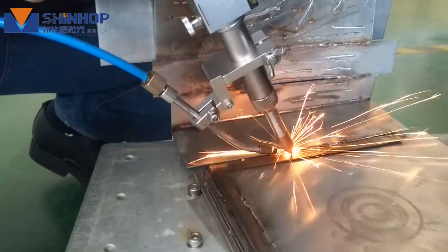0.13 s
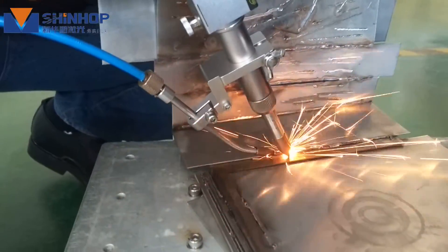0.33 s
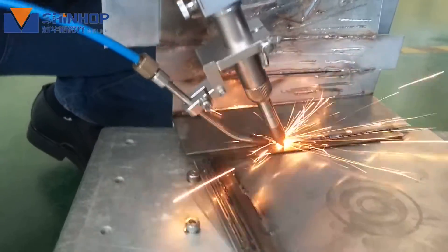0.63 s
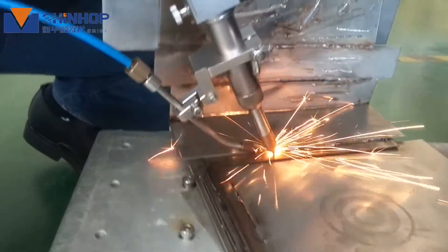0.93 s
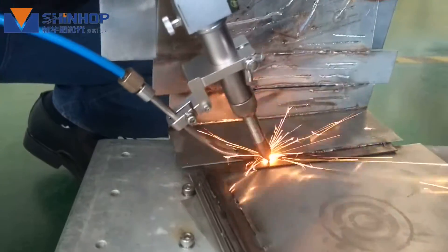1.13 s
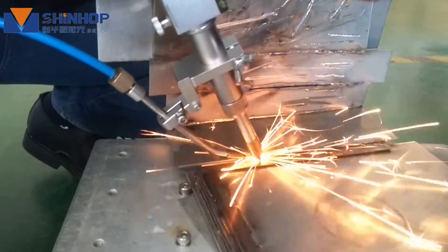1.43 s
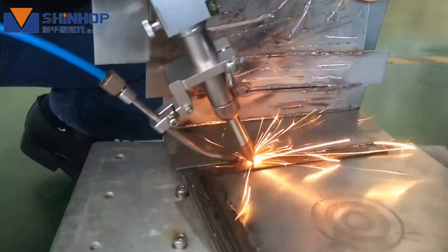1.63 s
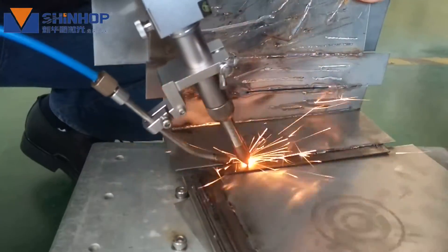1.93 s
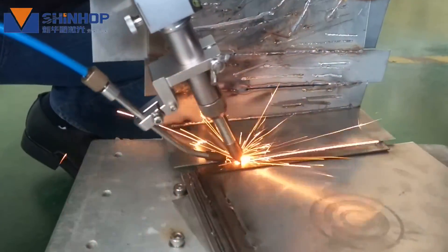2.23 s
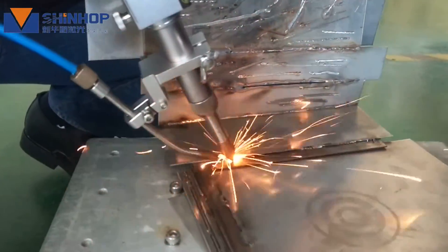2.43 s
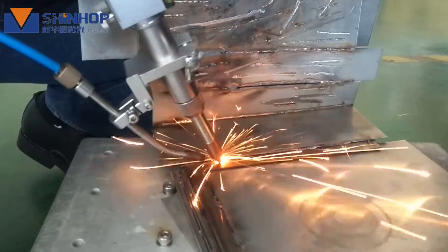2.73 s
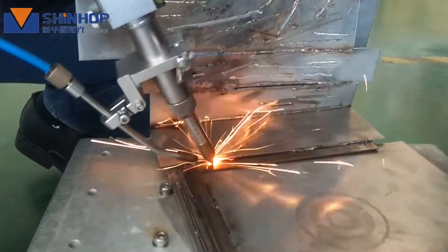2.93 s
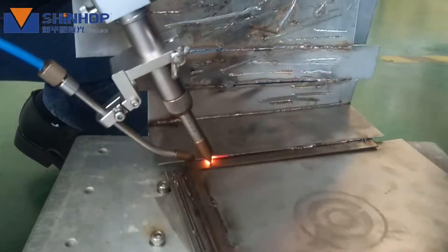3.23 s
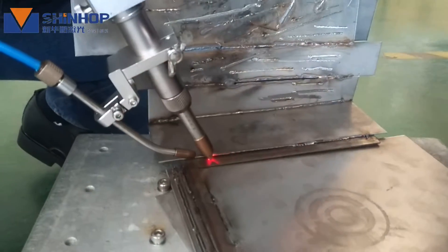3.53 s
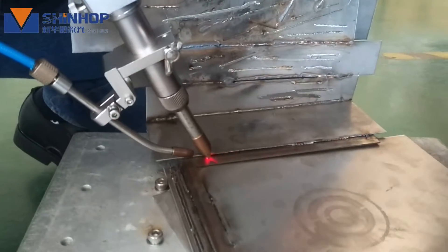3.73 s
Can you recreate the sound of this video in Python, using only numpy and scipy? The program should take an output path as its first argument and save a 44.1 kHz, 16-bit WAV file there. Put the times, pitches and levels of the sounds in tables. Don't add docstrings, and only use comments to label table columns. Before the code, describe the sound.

A handheld laser welder close to the microphone hisses and sizzles with a fast buzzing flutter and spatter pops; the sizzle stops, a valve clicks, gas drains, leaving hum in a workshop hall.

```python
import sys
import numpy as np
from scipy import signal
from scipy.fft import rfft, irfft
from scipy.io import wavfile
from scipy.ndimage import uniform_filter1d

SR = 44100
rng = np.random.default_rng(int(sys.argv[2]) if len(sys.argv) > 2 else 0)


def how_loud(loudness_db):
    steps = np.asarray(loudness_db, float) / 20
    return 10 ** steps


def waveform_to_disk(signal):
    frames = np.transpose(np.atleast_2d(signal))
    scaled = np.clip(frames, -1, 1) * 32767
    samples = np.round(scaled).astype(np.int16)
    wavfile.write(sys.argv[1], SR, samples)


N = 170667
T = np.arange(N) / SR
HZ = np.arange(N // 2 + 1) * SR / N + 1e-3


def curve(rows):
    return np.interp(T, *np.array(rows).T)


def unit(x):
    return x / np.sqrt(np.mean(x ** 2))


def noise():
    return rng.standard_normal(N)


def walk(rate_hz):
    hold = int(SR / rate_hz)
    steps = np.repeat(rng.standard_normal(N // hold + 1), hold)
    return unit(uniform_filter1d(uniform_filter1d(steps, hold), hold)[:N])


def tone(phase):
    return np.sqrt(2) * np.sin(phase)


def drifting_tone(hz):
    return tone(2 * np.pi * np.cumsum(hz) / SR)


def slope(points):
    f, db = np.array(points).T
    return how_loud(2 * np.interp(np.log(HZ), np.log(f), db))


def bell(f, width_hz):
    return 1 / (1 + (2 * (HZ - f) / width_hz) ** 2)


def peaks(rows, skirt=1.38):
    return sum(how_loud(2 * db) * bell(f, w) ** skirt for f, w, db in rows)


def bumps(rows):
    return how_loud(sum(db * bell(f, w) for f, w, db in rows))


def colour(x, power):
    return irfft(rfft(x) * np.sqrt(power), N)


def stations(start, end):
    return [start, start, start + 0.45 * (end - start), end]


# (time [s], station: 0 start, 1 early, 2 midway, 3 end, 4 beam off, 5 drained)
TORCH_TRAVEL = [(0, 0), (0.6, 0.76), (0.8, 1), (1.02, 1.5), (1.2, 1.74), (1.7, 2), (2.1, 3), (2.6, 3),
                (3.15, 3), (3.3, 4), (3.52, 2.5), (3.66, 6.5), (3.87, 5)]


def along(x, powers, steel):
    place = np.clip(curve(TORCH_TRAVEL), 0, len(powers) - 1)
    spectrum = rfft(x)
    out = 0
    for k, power in enumerate(powers):
        share = np.maximum(1 - np.abs(place - k), 0)
        out = out + share * irfft(spectrum * np.sqrt(power) * steel[k], N)
    return out / np.sqrt(np.mean(powers[0]))


# (frequency [Hz], width [Hz], level [dB])
GAS_START_PEAKS = [(2300, 79, -14), (2690, 180, -7), (2997, 262, -3), (3170, 230, -12), (4090, 180, -10.5),
                   (4500, 110, -18), (5430, 84, -9), (5900, 200, -13), (6450, 92, 2), (6520, 104, -4),
                   (7110, 140, -5.5), (7300, 130, -9)]
GAS_END_PEAKS = [(2246, 69, -14), (2780, 100, -15.5), (3017, 163, -2), (3340, 180, -10.5),
                 (4000, 500, -15.5), (4550, 320, -13.5), (4940, 210, -10), (5500, 164, -5.5),
                 (5920, 100, -2), (6070, 100, -10), (6860, 190, -2), (7324, 194, 2)]
GAS_REST_PEAKS = [(2313, 26, -3.5), (2750, 23, 0), (2984, 245, 1), (3350, 37, -4), (3660, 26, -13),
                  (4060, 190, -6), (4800, 87, -5), (5100, 150, -24), (5550, 210, -1.5), (5970, 34, -20),
                  (6630, 480, 0), (7370, 240, 1)]
# (frequency [Hz], width [Hz], level [dB])
GAS_TREBLE_PEAKS = [(8980, 390, -16.5), (9620, 340, -14.5), (10250, 330, -22), (10600, 200, -34),
                    (11200, 280, -24), (11750, 200, -38), (13120, 300, -21), (13600, 450, -30),
                    (14400, 200, -36), (15100, 220, -27), (15350, 250, -35)]
# (frequency [Hz], level [dB])
JET_NOISE = [(1500, -35.5), (2200, -34), (2600, -18), (4500, -20.5), (7300, -12), (8200, -52)]
# (frequency [Hz], level per Hz [dB])
ROAR_SLOPE = [(400, -16.5), (700, -1.5), (1150, 1.5), (1500, -6.5), (2100, -5.5), (2600, -19), (3500, -27)]
# (time [s], level [dB])
GAS_FLOW = [(0, -28.5), (0.17, -30), (0.3, -31), (0.5, -31.5), (0.7, -34), (0.82, -31.5), (0.95, -33),
            (1.2, -33), (2.0, -32.5), (3.1, -30.5), (3.3, -34.5), (3.5, -34.5), (3.62, -42), (3.75, -48),
            (3.87, -59)]


def gas(steel):
    hiss_edge = 1 / (1 + (HZ / 7770) ** 40)
    start, end, rest = [(peaks(rows) + slope(JET_NOISE)) * hiss_edge
                        for rows in (GAS_START_PEAKS, GAS_END_PEAKS, GAS_REST_PEAKS)]
    jet = noise() * how_loud(0.67 * walk(12) + 0.36 * walk(90))
    hiss = along(jet, stations(start, end) + [rest, rest], steel)
    treble_power = peaks(GAS_TREBLE_PEAKS, skirt=1.9) / np.mean(start)
    treble = colour(noise() * how_loud(1.1 * walk(43)), treble_power)
    roar_power = slope(ROAR_SLOPE) / (1 + (HZ / 4000) ** 8) * np.abs(steel[0]) ** 2
    roar = unit(colour(noise() * how_loud(1.44 * walk(5.97)), roar_power))
    flow_db = curve(GAS_FLOW)
    drain_db = np.minimum(flow_db - GAS_FLOW[0][1], 0)
    nozzle = how_loud(flow_db) * (hiss + treble * how_loud(0.11 * drain_db))
    return nozzle + how_loud(-44 + 0.62 * drain_db) * roar


# (frequency [Hz], width [Hz], level [dB])
POOL_START_PEAKS = [(6270, 230, 3.5), (6680, 920, -1), (7900, 110, -10), (8270, 130, -5.5),
                    (8700, 280, -14), (9570, 340, -5), (10450, 430, -7), (11070, 460, -5), (11910, 350, -2),
                    (12200, 250, -8), (13350, 700, -5.5), (14030, 370, 1), (14700, 300, -18),
                    (15150, 300, -7)]
POOL_END_PEAKS = [(6570, 700, 4.5), (7330, 200, 5), (8400, 600, -12), (9730, 380, -2), (10360, 780, 1.5),
                  (11160, 150, -1), (11600, 400, -8), (12400, 250, -5), (13500, 990, -0.5),
                  (14150, 800, 1.5), (14900, 500, -12), (15330, 350, -3)]
# (time [s], level [dB])
POOL_EFFORT = [(0, -29.5), (0.6, -29.5), (0.78, -27.5), (0.98, -24.5), (1.08, -29), (2.0, -33), (3.0, -34),
               (3.14, -31.5), (3.21, -35.5), (3.25, -46), (3.275, -60), (3.33, -92)]
# (time [s], peak level [dB])
SPATTER_POPS = [(0.0687, -17), (0.1032, -18), (0.1695, -20), (0.3621, -3), (0.63, -11), (0.7462, -25),
                (0.7662, -18), (0.886, -16), (0.9686, -18), (1.1473, -10), (1.1662, -12), (1.2466, -17),
                (1.8497, -20), (1.907, -12), (2.1246, -16.5), (2.4668, -22), (2.6663, -16), (2.7062, -15),
                (2.7262, -16), (2.7666, -20), (2.827, -14), (2.8494, -12), (2.9871, -11), (3.0864, -19.5),
                (3.1083, -14), (3.1283, -15)]


def pool(steel):
    wobble_hz, wobble_peak_s = 49.98, 0.0089
    spatter_per_s, spatter_db, spatter_spread_db = 650, -19, 3.5
    pop_lift_db, pop_fade_s = 11, 0.003
    turn = 2 * np.pi * wobble_hz * (T - wobble_peak_s) + 0.08 * walk(6.7)
    swing_db = 4 * np.cos(turn) - 1.5 * np.cos(2 * turn + 0.5)
    ticks = (rng.random(N) < spatter_per_s / SR) * rng.choice([-1, 1], N)
    ticks = ticks * how_loud(spatter_spread_db * rng.exponential(size=N))
    sizzle = noise() + how_loud(spatter_db) * unit(ticks)
    sizzle = sizzle * how_loud(swing_db + 0.56 * walk(9.16) + 0.49 * walk(120))
    pops = sum(how_loud(db + pop_lift_db) * (T > s) * np.exp(-np.abs(T - s) / pop_fade_s) for s, db in SPATTER_POPS)
    sizzle = unit(sizzle * (1 + pops))
    bed = how_loud(2 * -25) / (1 + (3900 / HZ) ** 4)
    powers = stations(peaks(POOL_START_PEAKS) + bed, peaks(POOL_END_PEAKS) + bed)
    return how_loud(curve(POOL_EFFORT)) * along(sizzle, powers, steel)


def plates(dips):
    lags_s = rng.uniform(0.004, 0.025, 8)
    signs = rng.choice([-1, 1], 8)
    echoes = sum(sign * np.exp(-2j * np.pi * HZ * lag) for sign, lag in zip(signs, lags_s))
    return (1 + how_loud(-22.5) * echoes) * bumps(dips)


# (frequency [Hz], width [Hz], depth [dB])
START_DIPS = [(2540, 69, -9), (3490, 190, -3.5), (5040, 150, -8), (5720, 90, -8), (6176, 99, -17),
              (7470, 300, -5.5), (8700, 200, -8), (10800, 120, -6), (11300, 110, -12), (12200, 150, -9),
              (12800, 400, -15)]
END_DIPS = [(3240, 110, -8), (4840, 100, -14.5), (5690, 110, -9), (5980, 70, -11), (8470, 270, -5),
            (9960, 210, -6.5), (11950, 120, -7), (12800, 330, -19), (14850, 400, -16)]
# (frequency [Hz], width [Hz], gain [dB])
EARLY_BUMPS = [(4150, 300, 5), (4500, 130, 8), (5030, 150, 8), (6460, 150, 2.5), (7300, 150, 1),
               (7700, 220, -4), (7750, 120, 10), (10100, 150, -2), (10250, 150, 7), (12100, 120, -6),
               (12420, 140, -5), (14150, 200, -3), (15200, 180, -9), (15450, 150, 10)]
MIDWAY_BUMPS = [(3370, 73, 5), (4060, 110, -4), (4530, 170, 4), (5000, 200, 2.5), (5880, 120, 6.5),
                (6020, 80, -9), (6980, 150, 3.5), (7350, 230, -4), (7800, 120, 5), (8500, 130, -1),
                (10580, 240, -9), (12300, 150, 8), (14000, 200, 3), (15150, 250, 0)]
DRAINED_BUMPS = [(2970, 320, -4), (4120, 460, 0.5), (5500, 500, 1.5), (6600, 900, -0.5), (8000, 400, -7)]


def near_steel():
    start, early, midway, end = stations(plates(START_DIPS), plates(END_DIPS))
    return [start, early * bumps(EARLY_BUMPS), midway * bumps(MIDWAY_BUMPS),
            end, end, end * bumps(DRAINED_BUMPS)]


def band(hz, share):
    return unit(colour(noise(), 1 / (1 + ((HZ - hz) / (share * hz)) ** 6)))


def valve():
    shut_s, thump_hz = 3.4538, 450
    thump_db, thump_t60_s = -34, 0.016
    rattle_db, rattle_t60_s = -45, 0.15
    age = np.maximum(T - shut_s, 0)
    thump = -how_loud(thump_db - 60 * age / thump_t60_s) * np.sin(2 * np.pi * thump_hz * age)
    rattle = (age > 0) * how_loud(rattle_db - 60 * age / rattle_t60_s) * band(420, 0.52)
    return thump + rattle


def vent():
    start_s, rise_s, fall_s = 3.12, 0.2, 0.21
    centre_hz, width_hz = 1700, 770
    age = np.maximum(T - start_s, 0)
    puff = unit(colour(noise(), 1 / (1 + (2 * (HZ - centre_hz) / width_hz) ** 6)))
    return how_loud(-48) * puff * (1 - np.exp(-age / rise_s)) * np.exp(-0.5 * (age / fall_s / 2) ** 2)


# (multiple of 100 Hz, level [dB])
HUM_HARMONICS = [(1, -41), (2, -54.5), (3, -51.5), (4, -60.5), (5, -78), (6, -62.5), (7, -62), (8, -70)]
# (frequency [Hz], level per Hz [dB])
HALL_SLOPE = [(25, -42), (60, -12), (85, -11), (140, -5), (270, -17.5), (500, -12), (850, -8),
              (1300, -17.5)]


def chiller():
    hum_hz, hum_rise_s, blade_hz = 100.07, 0.0075, 861
    hum = 0
    for k, db in HUM_HARMONICS:
        level = how_loud(db + 0.63 * k ** 0.5 * walk(14))
        hum = hum + level * tone(2 * np.pi * k * hum_hz * (T - hum_rise_s))
    blade = how_loud(-60.5 + 2 * walk(4.1)) * drifting_tone(blade_hz + 1.6 * walk(2.13))
    wash_power = slope(HALL_SLOPE) / (1 + (HZ / 1300) ** 1.5) / (1 + (HZ / 7770) ** 20)
    wash = unit(colour(noise() * how_loud(0.57 * walk(2.7)), wash_power))
    return hum + blade + how_loud(-50.5) * wash


# (on [s], off [s], level [dB])
COMPRESSOR_RUNS = [
    (-0.1, 1.95, -59),
    (2.44, 2.76, -56),
]


def compressor():
    edge_s = 0.03
    on = sum(how_loud(db) * np.clip(np.minimum(T - a, b - T) / edge_s, 0, 1) for a, b, db in COMPRESSOR_RUNS)
    return on * how_loud(2.0 * walk(6.3)) * drifting_tone(63 + 2.0 * walk(4.46))


# (time [s], level [dB], frequency [Hz], length [s])
FLOOR_THUDS = [
    (0.372, -41.5, 177, 0.024),
    (2.777, -51, 150, 0.042),
    (2.89, -48, 170, 0.066),
    (3.7, -58.5, 140, 0.24),
]


def thuds():
    return sum(how_loud(db) * band(hz, 0.27) * np.exp(-0.5 * ((T - s) / length_s) ** 2)
               for s, db, hz, length_s in FLOOR_THUDS)


def scene():
    steel = near_steel()
    welding = gas(steel) + pool(steel) + valve() + vent()
    hall = chiller() + compressor() + thuds()
    return (welding + hall)[None]


def low_pass(x):
    return signal.sosfilt(signal.butter(12, 15530, fs=SR, output="sos"), x)


# (time [s], gain [dB])
PHONE_GAIN = [(0, -2), (0.04, 0), (0.75, 1.5), (0.9, 0), (1.06, -2), (1.7, -0.5), (2.4, -0.5), (3.1, 0),
              (3.27, -0.5), (3.45, 4), (3.6, 6), (3.87, 4.5)]


def record(dry):
    mix = dry * how_loud(uniform_filter1d(curve(PHONE_GAIN), size=1500))
    return low_pass(mix)


dry = scene()
out = record(dry)
waveform_to_disk(out)
```